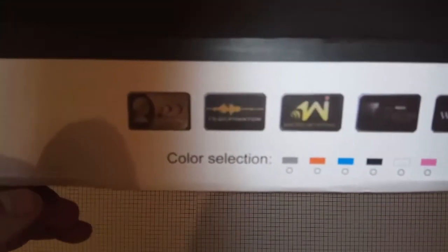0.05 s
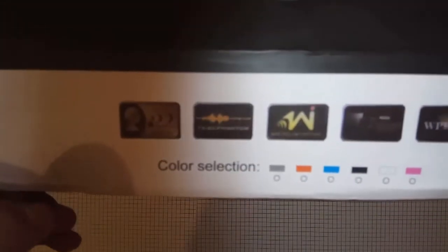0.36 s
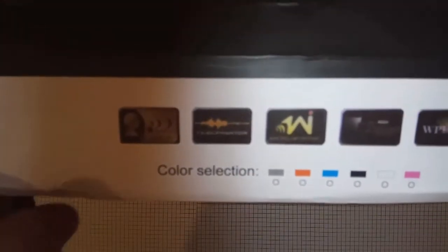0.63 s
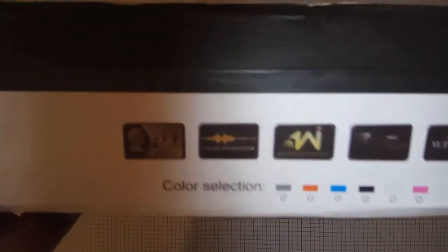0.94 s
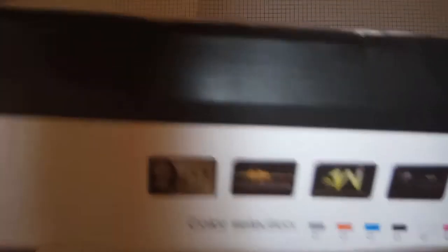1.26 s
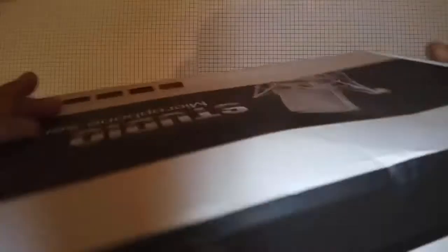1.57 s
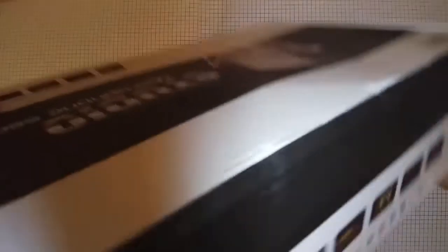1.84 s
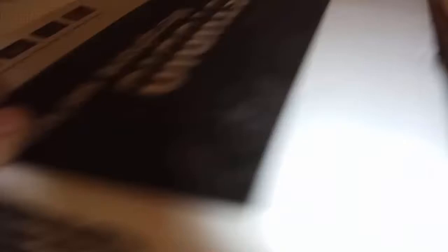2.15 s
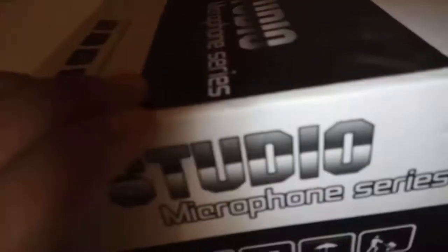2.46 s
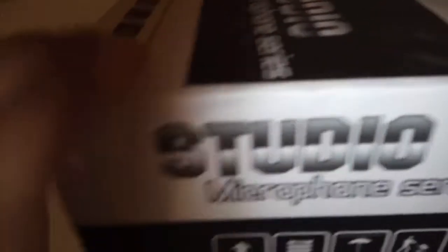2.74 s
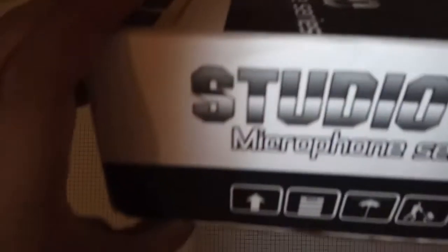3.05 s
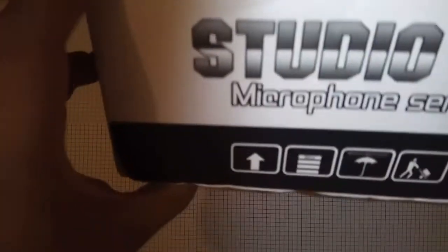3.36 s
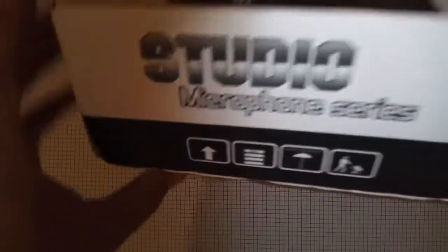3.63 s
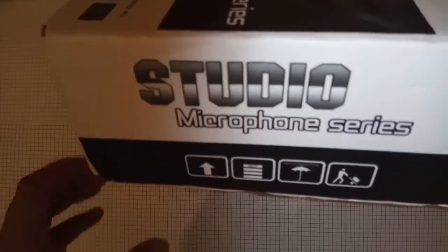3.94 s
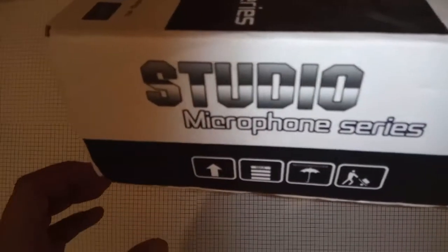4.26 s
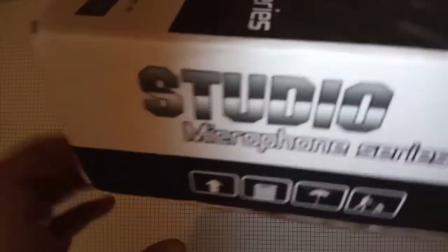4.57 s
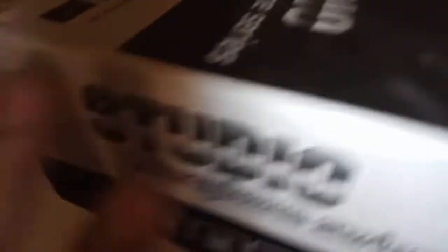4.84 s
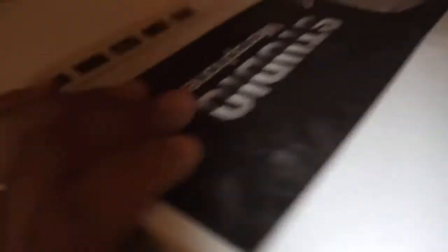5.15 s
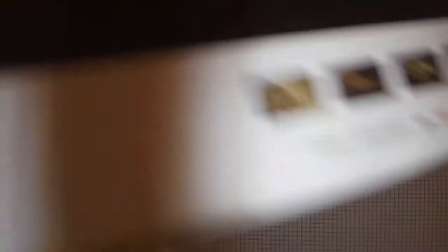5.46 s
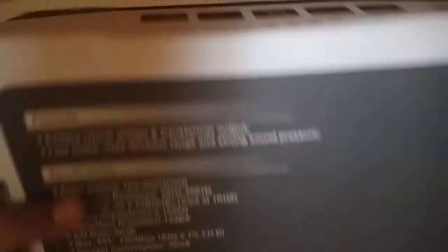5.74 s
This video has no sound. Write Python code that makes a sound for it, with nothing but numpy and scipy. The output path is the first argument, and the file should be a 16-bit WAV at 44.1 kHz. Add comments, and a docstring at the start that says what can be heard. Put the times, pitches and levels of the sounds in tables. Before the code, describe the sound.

For the first second, fingers faintly brush and touch a glossy cardboard box. A quick run of light, hollow taps follows until about 1.3 seconds. From 1.4 to 2.4 seconds, hands grip and turn the box with louder hissing, rasping strokes, a low rumble from the panels and small crease snaps. Softer rubbing and scattered taps continue to about 3.7 seconds, with a firmer knock near 2.9. A lull follows, holding only a faint brush, a click and a couple of tiny touches. At 4.9 seconds the scraping returns and builds, with taps and sharp snaps. The box tips onto the table, hitting on one edge with a loud hollow thump near 5.6 seconds, then dropping on its face near 5.75 with a low boom. The microphone is close; the small room rings briefly after each blow, over faint room tone and steady hiss.

```python
"""Faint brushes and finger taps on a glossy cardboard box come first, then louder hissing, rasping strokes as
hands grip and turn it on a table. Stick-slip friction of skin on card drives the panels into a rumble; taps
ring their modes and creases snap. Near the end the box is set down on the table with a few heavy blows. The
small room rings on after each blow, over faint room tone and the hiss of a nearby phone."""
import sys
import numpy as np
from scipy import signal
from scipy.fft import rfft, irfft, next_fast_len
from scipy.io import wavfile
from scipy.ndimage import uniform_filter1d

SR = 44100
rng = np.random.default_rng(int(sys.argv[2]) if len(sys.argv) > 2 else 0)


def waveform_to_disk(signal):
    """Save audio, clipped to [-1, 1], as 16-bit WAV at the path in sys.argv[1]."""
    frames = np.transpose(np.atleast_2d(signal))
    scaled = np.clip(frames, -1, 1) * 32767
    samples = np.round(scaled).astype(np.int16)
    wavfile.write(sys.argv[1], SR, samples)


N = 264600


# a hand slides: start_s, length_s, rise_s, hiss_db, rasp_db, rumble_db, left_minus_right_db
HAND_STROKES = [(0.208, 0.18, 0.025, -85.5, -84, -74, 0), (0.561, 0.13, 0.017, -76, -87, -75, -6),
                (1.01, 0.055, .03, -61.5, -60, -70, 4), (1.245, 0.032, 0.01, -57.5, -57, -68, -7),
                (1.421, 0.069, 0.03, -45, -52.5, -48, -2), (1.589, 0.087, 0.0072, -46.5, -48.5, -44, 1),
                (1.65, 0.17, 0.062, -38, -45.5, -50.5, 1.5), (1.805, 0.039, 0.028, -37, -43.5, -38.5, 1),
                (1.885, .14, 0.069, -43.5, -44.5, -49, 1.5), (2.04, 0.26, 0.046, -48, -73, -53.5, 0),
                (2.228, 0.14, 0.014, -39, -52.5, -56.5, 0.5),
                (2.504, 0.046, 0.0075, -51.5, -55.5, -49, 0.5), (2.659, 0.062, .02, -57, -54.5, -50.5, 4),
                (2.712, 0.093, 0.037, -45.5, -58.5, -72, -3), (3.147, 0.11, 0.03, -93, -74, -62, 0),
                (3.288, 0.13, 0.11, -60.5, -61, -64.5, -2.5),
                (3.494, 0.078, 0.052, -50, -52.5, -45.5, -0.5),
                (3.581, 0.067, 0.018, -54, -55.5, -53.5, 0.5), (3.851, 0.18, 0.023, -71, -65.5, -71, -1),
                (4.928, 0.099, 0.022, -51.5, -77, -62, -4.5), (5.046, 0.051, 0.011, -49, -55, -51.5, -2.5),
                (5.111, 0.052, .04, -49, -48.5, -40, -2), (5.21, 0.057, 0.013, -43, -51, -43.5, 1.5),
                (5.328, 0.081, 0.028, -49.5, -69, -72, 1), (5.395, 0.037, 0.016, -36.5, -39.5, -36.5, 1),
                (5.623, 0.039, .01, -44.5, -49, -38, 1), (5.672, 0.1, 0.063, -46, -44.5, -37.5, 2)]
# the held box creeps in the grip: start_s, end_s, hiss_db
GRIP_HOLDS = [(0.913, 1.32, -66.5), (1.519, 2.442, -53), (2.505, 2.914, -59.5), (3.0, 3.32, -79),
              (3.324, 3.75, -64), (4.914, 5.997, -57.5)]

def hand_motion(release_t60_s=0.19, hold_rise_s=0.046, hold_rasp_db=0.1, hold_rumble_db=-1.5):
    """Incoherent sources add in power: strokes and holds give hiss, rasp, rumble and balance in dB."""
    t = np.arange(N) / SR
    holds = [(start, end - start, hold_rise_s, db, db + hold_rasp_db, db + hold_rumble_db, 0)
             for start, end, db in GRIP_HOLDS]
    power, lean = np.full((3, N), 1e-12), np.zeros(N)
    for start, length, rise, hiss, rasp, rumble, pan in HAND_STROKES + holds:
        speed = np.clip((t - start) / rise, 0, 1) * fade(np.maximum(t - start - length, 0), release_t60_s)
        power += (undb([[hiss], [rasp], [rumble]]) * speed) ** 2
        lean += pan * (undb(hiss) * speed) ** 2
    return (*(10 * np.log10(power)), lean / power[0])


# spectra of skin hissing on card and of rasping fibres: frequency_hz, level_db
SKIN_SPECTRUM = [(1500, -24.5), (3000, -3.5), (4500, -3), (6300, 3), (8300, -5), (11000, 0), (13000, -3.5),
                 (14900, 6.5), (16000, -3)]
FIBRE_SPECTRUM = [(500, -29), (900, 5), (1300, 1), (2000, 3), (3200, 3), (5000, 2), (9000, -21.5)]

def sliding(rasp_trim_db=-1.5, rumble_trim_db=-3, judder_db=-12, judder_hz=135):
    """Sliding friction radiates a hiss and a rasp, and forces the panels into vibration."""
    hiss_db, rasp_db, rumble_db, pan_db = hand_motion()
    grip_db = 0.95 * walk(60)  # finger pressure trembles
    grains = slips(rate_hz=800, spread_db=2.5)
    hiss = unit(colour(two_mics(N) + undb(-4) * grains, SKIN_SPECTRUM)) * undb(hiss_db + grip_db)
    drag = two_mics(N) + undb(-1) * grains
    rasp = unit(colour(drag, FIBRE_SPECTRUM)) * undb(rasp_db + rasp_trim_db + grip_db)
    # the hands wander between slack faces and stiff edges
    t = np.arange(SR // 5) / SR
    rings = [panel(t, pitch, scatter_db=-1, radiate_hz=252) for pitch in (0.945, 1.231)]
    slack, stiff = (unit(cut(convolve(drag, ring), 990, "low")) for ring in rings)
    stiff_share = (1 + np.tanh(walk(11))) / 2
    body = np.sqrt(1 - stiff_share) * slack + np.sqrt(stiff_share) * stiff
    # the whole box judders on the table
    judder = undb(judder_db) * unit(cut(cut(drag, judder_hz, "low", order=3), judder_hz, "high"))
    rumble = (body + judder) * undb(rumble_db + rumble_trim_db + 2 * walk(30.19))
    return sides(pan_db) * (hiss + rasp) + rumble


def slips(rate_hz, spread_db, bunch_db=4):
    """Stick-slip motion releases tiny impulses in bunches, a few much stronger than the rest."""
    sizes = undb(spread_db * np.minimum(rng.exponential(size=N), 4))
    density = rate_hz * undb(bunch_db * walk(110))
    return unit((rng.random(N) < density / SR) * sizes * rng.standard_normal(N))


# bending modes of the box panels: frequency_hz, level_db, t60_s
PANEL_MODES = [(135, -15.5, 0.069), (258.7, 0.5, 0.046), (330, -6, 0.064), (402, 0.5, 0.027),
               (511, 0.5, 0.036), (778, 3.5, 0.014), (1026, -3, 0.015), (1308, -2.5, 0.029),
               (1730, -29, 0.005), (1980, -21, 0.0099)]

def panel(t, pitch_ratio, scatter_db, radiate_hz=140, rise_s=0.00023):
    """Modal superposition: a panel rings as damped sines, neighbouring modes in opposite phase."""
    offsets_db = scatter_db * rng.standard_normal(len(PANEL_MODES))
    ring = sum((-1) ** k * undb(db + offsets_db[k]) * fade(t, t60)
               * np.sin(2 * np.pi * hz * pitch_ratio * t) for k, (hz, db, t60) in enumerate(PANEL_MODES))
    # a small stiff patch radiates much less bass than a whole face
    lowest_hz = radiate_hz * pitch_ratio * max(pitch_ratio, 1) ** 2
    return cut(ring * (1 - np.exp(-t / rise_s)), lowest_hz, "high", order=3)


# fingers strike a panel: start_s, thud_db, tick_db, pitch_ratio
FINGER_TAPS = [(0.233, -58.5, -80, 1), (0.579, -63.5, -88, 1.09), (0.957, -52, -66, 1.51),
               (1.053, -51, -54.5, 1.27), (1.145, -44.5, -45.5, 1.2), (1.182, -50, -53.5, 1.3),
               (1.236, -44, -51, 1.3), (1.269, -37.5, -45, 0.92), (1.299, -47.5, -50, 1.49),
               (1.655, -36.5, -36.5, 1.294), (2.59, -45, -55, 0.88), (2.667, -45.5, -59, 0.79),
               (2.888, -38.5, -49, 0.834), (3.237, -61.5, -71, 0.94), (3.542, -46, -69, 1.13),
               (3.584, -44, -65, 0.85), (4.617, -63.5, -67, 1.18), (4.728, -66, -67.5, 1.16),
               (4.971, -47.5, -71, 0.46), (5.098, -39.5, -44, 0.83), (5.168, -42, -44, 1.2),
               (5.47, -37, -50, 1.12)]
# a crease snaps, or (at 2.024 s) a sliding finger catches sharply: start_s, tick_db, crack_db
SNAPS_AND_CATCHES = [(1.595, -46, -67.5), (2.024, -54, -53), (2.239, -52, -47), (2.509, -49.5, -72),
                     (3.91, -59.5, -65), (5.206, -41, -38.5), (5.406, -37.5, -58)]
# the box is set down on the table: start_s, thud_db, crack_db, tick_db, boom_db, pitch_ratio,
# left_minus_right_db
BOX_LANDINGS = [(5.569, -15.5, -22.5, -38.5, -41, 0.99, 0.5), (5.63, -38, -42, -55, -43, 0.98, 8),
                (5.749, -29, -46, -40.5, -62, 0.77, -16), (5.758, -18.5, -34, -47, -33.5, 0.85, 12),
                (5.792, -34, -51, -61, -42, 1.11, -9)]
# spectrum of a tick on the glossy surface: frequency_hz, level_db
TICK_SPECTRUM = [(1500, 23.5), (3000, 15.5), (5500, 16), (8300, 2), (11000, 11), (13000, -35), (15000, -36)]

def knocks(split_hz=850, soft_hz=2600, fibre_db=-6, firm_db=-48, brush_db=-66, press_s=0.0014):
    """Impact excitation: a blow thuds in the low modes, cracks in the high ones and ticks on the gloss."""
    blows = [(start, thud, crack, tick, pitch, pan)
             for start, thud, crack, tick, _, pitch, pan in BOX_LANDINGS]
    # stiff, high panels crack more: 8 dB per octave
    blows += [(start, thud, thud - 9.5 + 8 * np.log2(pitch), tick, pitch, 0)
              for start, thud, tick, pitch in FINGER_TAPS]
    blows += [(start, crack - 7, crack, tick, 1.45, 0) for start, tick, crack in SNAPS_AND_CATCHES]
    out = np.zeros((2, N + SR))
    t = np.arange(SR // 5) / SR
    for start, thud_db, crack_db, tick_db, pitch_ratio, pan_db in blows:
        snap_db = -10.5 + 0.25 * (tick_db - firm_db)  # firm contacts snap
        ring = panel(t, pitch_ratio, scatter_db=1.63)
        thud = attack(cut(ring, split_hz, "low", order=3))
        fibres = attack(colour(contact(t, snap_db, t60_s=0.025), FIBRE_SPECTRUM))
        crack = attack(cut(ring, split_hz, "high", order=3)) + undb(fibre_db) * fibres
        crack = attack(cut(crack, soft_hz * pitch_ratio, "low", order=4))  # yielding card rounds the blow
        tick = attack(colour(contact(t, snap_db, t60_s=0.048), TICK_SPECTRUM))
        treble = undb(crack_db + 1) * crack + undb(tick_db - 1) * tick
        blow = undb(thud_db - 1) * thud + sides(pan_db) * treble
        if crack_db < brush_db:  # a brushing fingertip presses in slowly
            blow *= 1 - np.exp(-t / press_s)
        add_at(out, start, blow)
    return out[:, :N]


def contact(t, snap_db, t60_s):
    """A contact transient is one impulse followed by a decaying crunch of fibres."""
    return undb(snap_db) * attack(1. * (t == 0)) + attack(two_mics(len(t)) * fade(t, t60_s))


# modes of the table top: frequency_hz, level_db, t60_s
TABLE_MODES = [(55, -2.5, 0.17), (110.8, 3, 0.37)]

def table_booms(rise_s=0.0013):
    """Mechanical coupling passes each tap and landing to the table top, which booms in its low modes."""
    t = np.arange(SR) / SR
    boom = sum(undb(db) * fade(t, t60) * np.sin(2 * np.pi * hz * t) for hz, db, t60 in TABLE_MODES)
    boom *= 1 - np.exp(-t / rise_s)
    out = np.zeros(N + SR)
    for start, thud_db, _, pitch_ratio in FINGER_TAPS:
        coupling_db = -14.5 - 3.5 * np.log2(pitch_ratio)  # slack, wide faces pass on more
        add_at(out, start, undb(thud_db + coupling_db) * boom)
    for start, _, _, _, boom_db, _, _ in BOX_LANDINGS:
        add_at(out, start, undb(boom_db) * boom)
    return out[:N]


# spectrum of the crackling coat: frequency_hz, level_db
COAT_SPECTRUM = [(800, -15), (2000, -2), (5500, 2.5), (9000, -5.5), (15000, 2)]

def crackles(t60_s=0.011, rubbed_db=-10, hiss_share=0.33):
    """Acoustic emission: the glossy coat clicks at each crease snap or finger catch and crackles sparsely when
    rubbed."""
    t = np.arange(SR // 20) / SR
    clicks = np.zeros((2, N + len(t)))
    for start, tick_db, _ in SNAPS_AND_CATCHES:
        click = attack(colour(two_mics(len(t)) * fade(t, t60_s), COAT_SPECTRUM))
        add_at(clicks, start, undb(tick_db + 1) * click)
    hiss_db, rasp_db, _, _ = hand_motion()
    releases = np.tile(slips(rate_hz=40, spread_db=5), (2, 1))
    burst = two_mics(len(t)) * fade(t, t60_s)
    crackle = unit(colour(convolve(releases, burst), COAT_SPECTRUM))
    return clicks[:, :N] + crackle * undb(rubbed_db + hiss_share * hiss_db + (1 - hiss_share) * rasp_db)


# standing waves of the room: frequency_hz, resonance_gain_db, t60_s
STANDING_WAVES = [(113.4, -0.5, 0.79), (243.8, 1, 0.7), (294, 12.5, 0.66), (324.4, 6.5, 0.27),
                  (415, -2.5, 0.24), (430, -7, 0.37), (497, 5, 0.4), (822.5, 7.5, 0.11)]

def room(x, early_db=-7, late_db=-4, treble_db=-7, split_hz=2000):
    """Reverberation: early reflections come at once, then a diffuse tail and standing waves die away."""
    t = np.arange(SR) / SR

    def reflections(onset, t60_s):
        """Absorption makes a diffuse field decay exponentially; unit energy per channel."""
        response = two_mics(SR) * fade(t, t60_s) * onset
        return response / np.sqrt(np.sum(response ** 2) / 2)

    early = reflections(t > .003, t60_s=0.079)
    build_up = np.clip((t - .008) / 0.016, 0, 1)
    low = cut(reflections(build_up, t60_s=0.51), split_hz, "low")
    high = cut(reflections(build_up, t60_s=0.74), split_hz, "high")
    late = low + undb(treble_db) * high
    diffuse = cut(undb(early_db) * early + undb(late_db) * late, 128, "high", order=4)
    standing = np.zeros((2, SR))
    for k, (hz, db, t60) in enumerate(STANDING_WAVES):
        balance = sides((-1) ** k * 2.0)  # each microphone has its own place in the wave
        amplitude = undb(db) * 2 * np.log(1000) / (t60 * SR)
        standing += balance * amplitude * fade(t, t60) * np.sin(2 * np.pi * hz * t)
    return x + convolve(x, diffuse + standing)


# spectra of the room tone and of microphone self-noise: frequency_hz, level_db
AMBIENT_SPECTRUM = [(25, -15), (55, -5.5), (85, -10), (112, 1.5), (160, -6.5), (300, -12), (500, -15.5),
                    (1200, -19), (4000, -19), (15000, -31.5)]
SELF_NOISE_SPECTRUM = [(1000, -4.5), (4000, -35), (7000, -2), (10000, -5), (11500, 9), (13500, 2.5),
                       (15200, 16), (16000, -31)]

def background(tone_db=-72, hiss_db=-66):
    """The noise floor: faint low room tone, and steady electronic hiss mostly on the right."""
    tone = unit(colour(two_mics(N), AMBIENT_SPECTRUM)) * undb(tone_db + 0.87 * walk(5.19))
    hiss = unit(colour(rng.standard_normal((2, N)), SELF_NOISE_SPECTRUM)) * undb(hiss_db)
    return tone + hiss * undb([[-20], [0]])


def two_mics(size, spacing_m=0.19):
    """Diffuse-field coherence: noise is alike at two microphones in the bass, unrelated in the treble."""
    coherence = .88 * np.sinc(2 * np.fft.rfftfreq(size, 1 / SR) * spacing_m / 343)
    spectra = rfft(rng.standard_normal((2, size)))
    mid, side = irfft(spectra * np.sqrt([1 + coherence, 1 - coherence]), size)
    return np.array([mid + side, mid - side]) / np.sqrt(2)


def off_centre(x, lag_samples=4):
    """Path difference: sound from the off-centre box reaches the left microphone first."""
    return np.array([x[0], np.pad(x[1], (lag_samples, 0))[:N]])


def sides(pan_db):
    """Constant-power left and right gains for a level difference."""
    gains = undb(np.array([[.5], [-.5]]) * pan_db)
    return gains / np.sqrt(np.mean(gains ** 2, axis=0))


def colour(x, points):
    """Minimum-phase filtering imposes a (frequency_hz, level_db) spectrum and keeps attacks sharp."""
    size = next_fast_len(2 * x.shape[-1])
    size += size % 2
    hz, db = np.transpose(points)
    gain_db = np.interp(np.log(np.arange(size // 2 + 1) * SR / size + 1), np.log(hz), db)
    cepstrum = irfft(np.log(undb(gain_db)))
    cepstrum[1:size // 2] *= 2
    cepstrum[size // 2 + 1:] = 0
    return irfft(rfft(x, size) * np.exp(rfft(cepstrum)))[..., :x.shape[-1]]


def cut(x, hz, kind, order=2):
    """Maximally flat low-pass or high-pass filter."""
    return signal.sosfilt(signal.butter(order, hz, kind, fs=SR, output="sos"), x)


def convolve(x, response):
    """Convolution passes a stereo sound through an impulse response."""
    return signal.fftconvolve(x, np.atleast_2d(response), axes=1)[:, :N]


def fade(t, t60_s):
    """Exponential damping, 60 dB in t60_s."""
    return np.exp(-np.log(1000) * t / t60_s)


def walk(rate_hz):
    """Smooth random modulation with an rms of one."""
    step = int(SR / rate_hz)
    stairs = np.repeat(rng.standard_normal(N // step + 1), step)
    return unit(uniform_filter1d(stairs, step)[:N])


def undb(db):
    """Amplitude ratio of a level in decibels."""
    return 10 ** (np.asarray(db) / 20)


def unit(x):
    """Normalise to an rms of one."""
    return x / np.sqrt(np.mean(x ** 2))


def attack(x):
    """Normalise to an rms of one over the first 10 ms."""
    return x / np.sqrt(np.mean(x[..., :SR // 100] ** 2))


def add_at(out, start_s, sound):
    """Superpose a sound from start_s on."""
    first = int(start_s * SR)
    out[..., first:first + sound.shape[-1]] += sound


def scene(rub_direct=0.14):
    """Sources superpose in one room; rubbing faces the phone, so its direct-to-reverberant ratio rises."""
    rubbing = off_centre(sliding() + crackles())
    hits = off_centre(knocks() + table_booms())
    return room(hits + (1 - rub_direct) * rubbing) + rub_direct * rubbing + background()


def record(dry):
    """Band limiting: the phone passes 51 Hz to 15.6 kHz."""
    low_pass = signal.ellip(10, .2, 70, 15600, fs=SR, output="sos")
    return signal.sosfilt(low_pass, cut(dry, 51, "high"))


dry = scene()
out = record(dry)
waveform_to_disk(out)
```